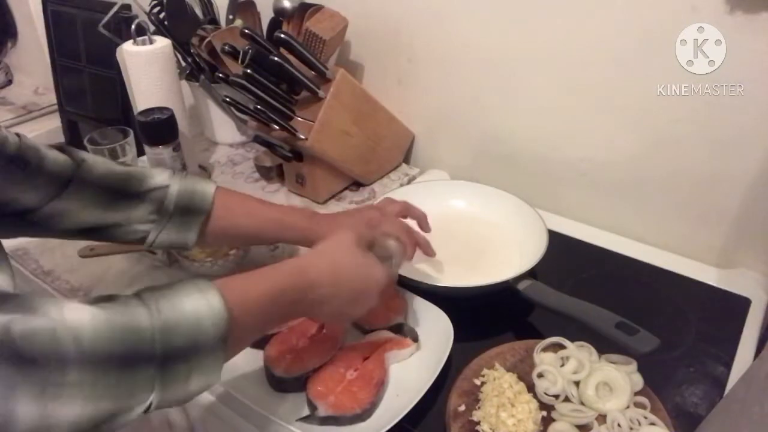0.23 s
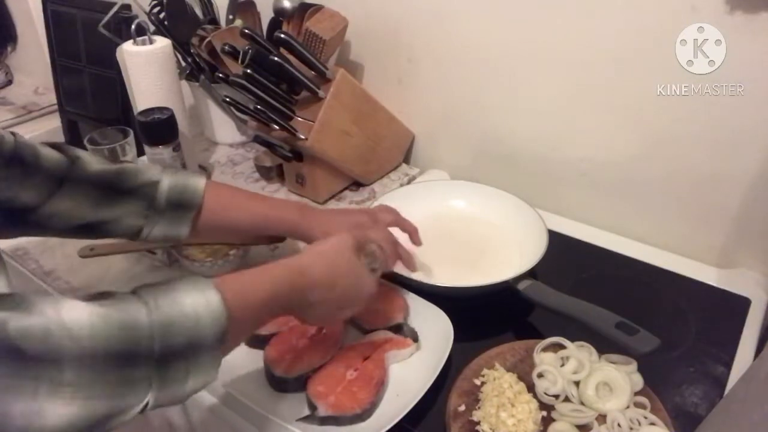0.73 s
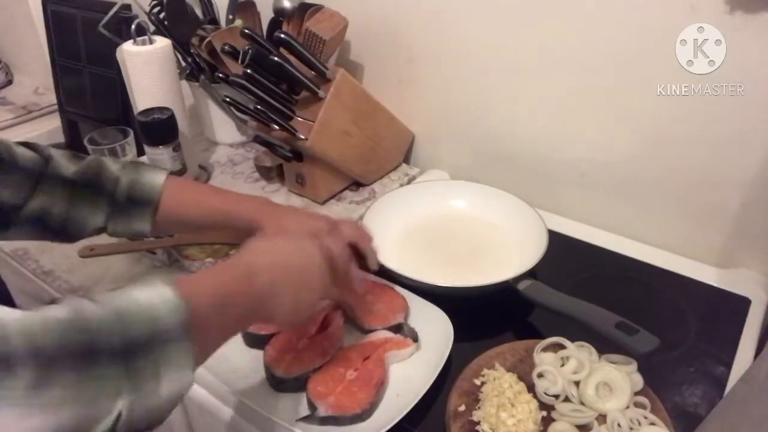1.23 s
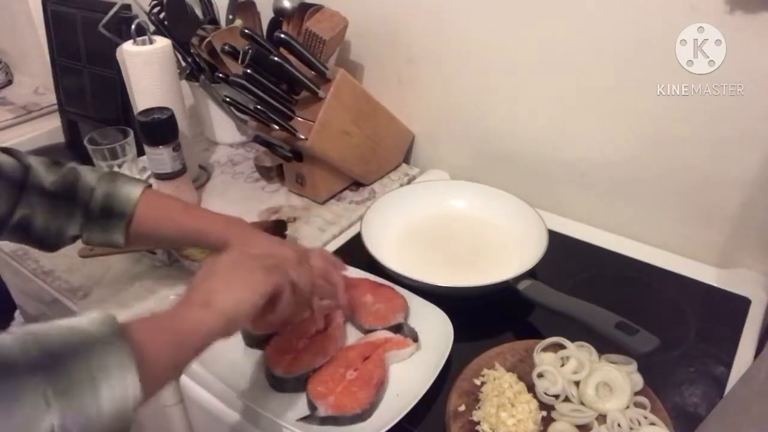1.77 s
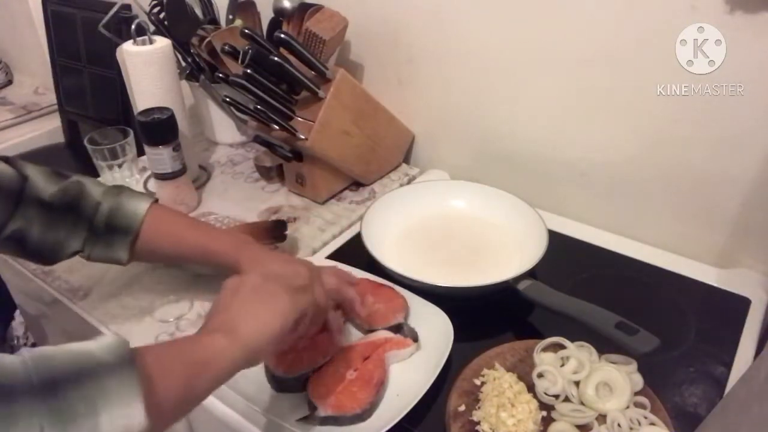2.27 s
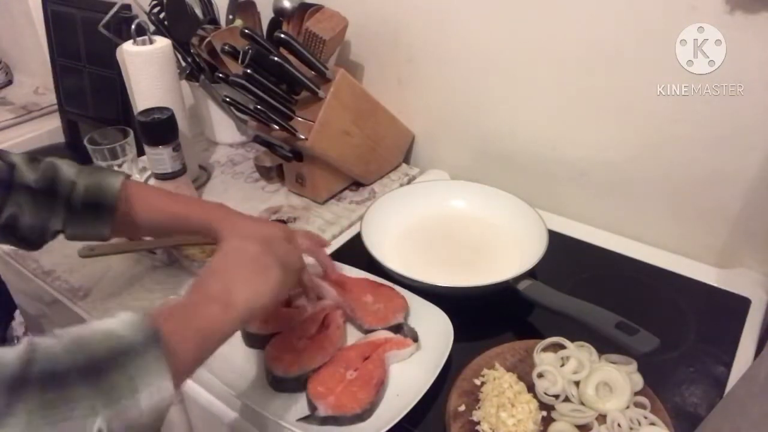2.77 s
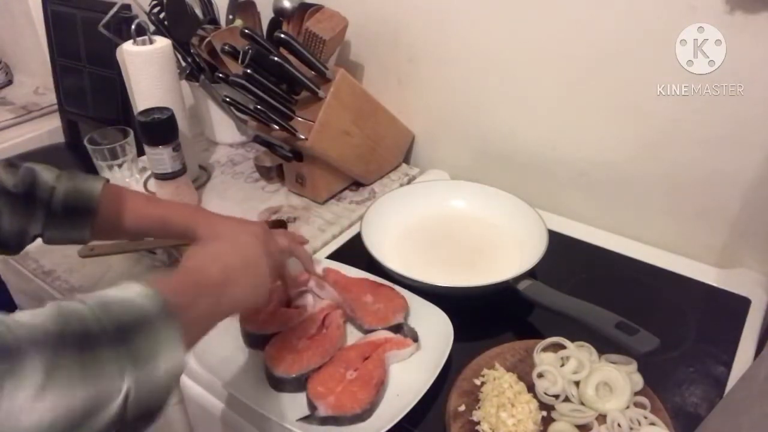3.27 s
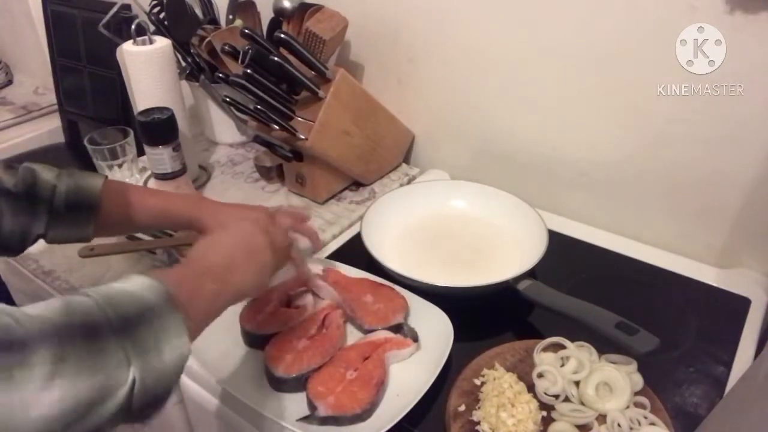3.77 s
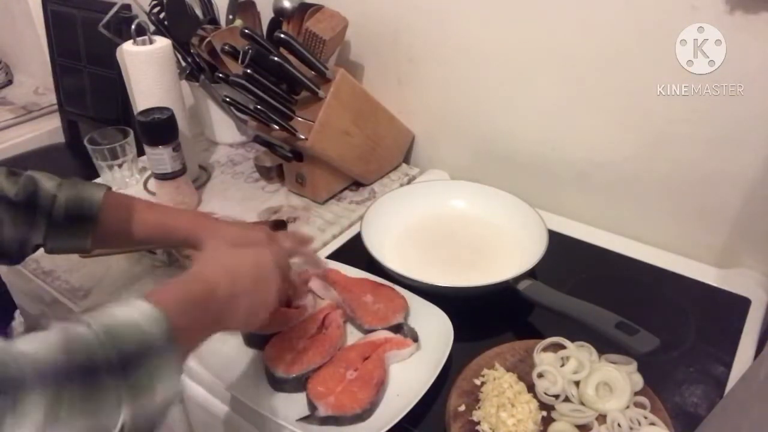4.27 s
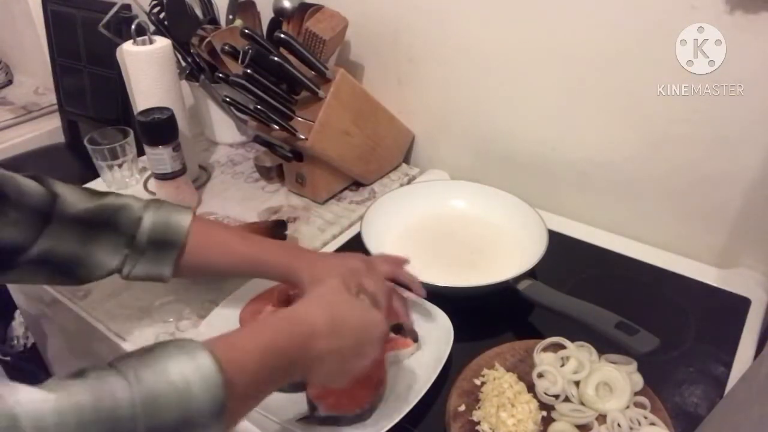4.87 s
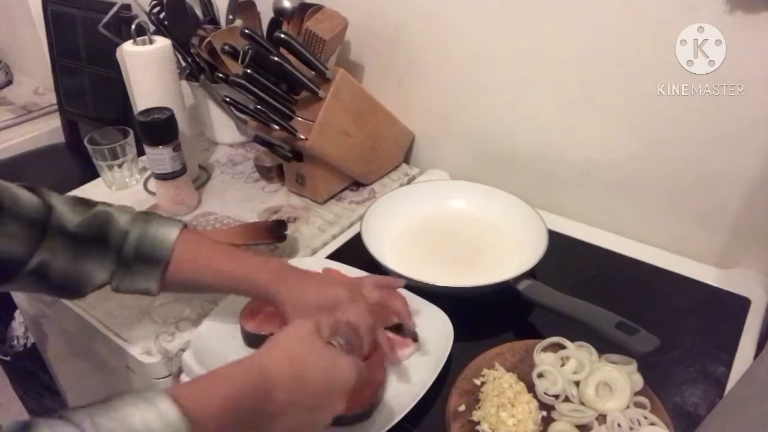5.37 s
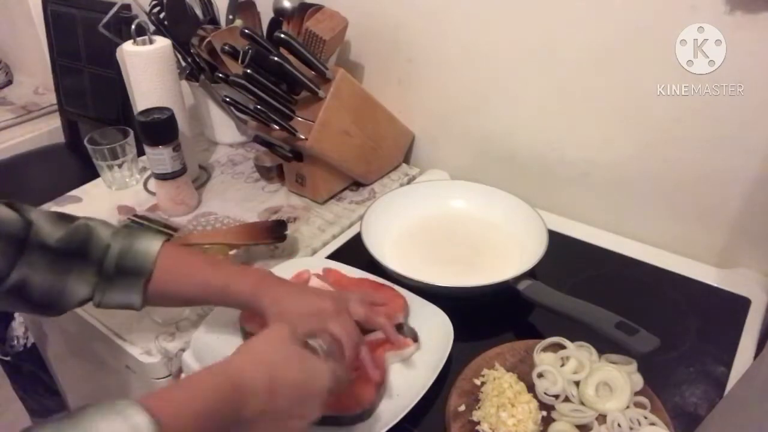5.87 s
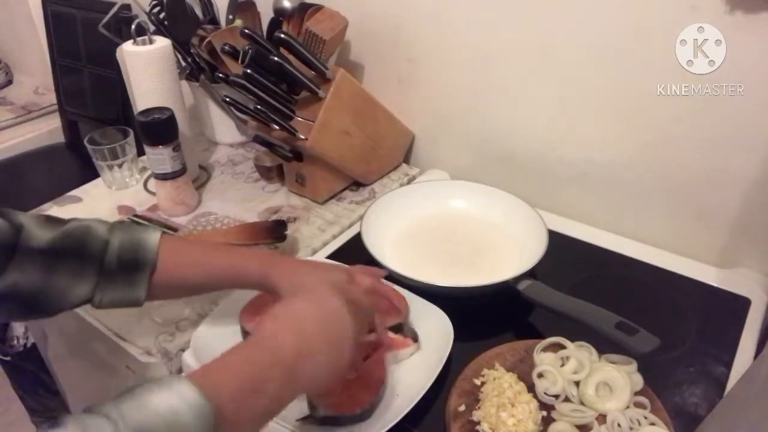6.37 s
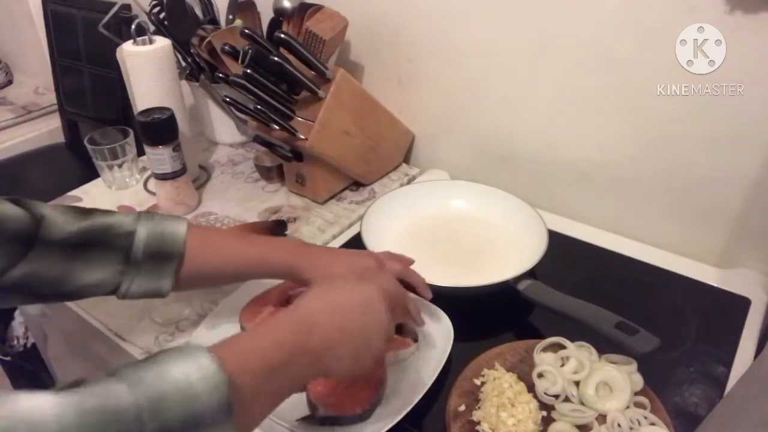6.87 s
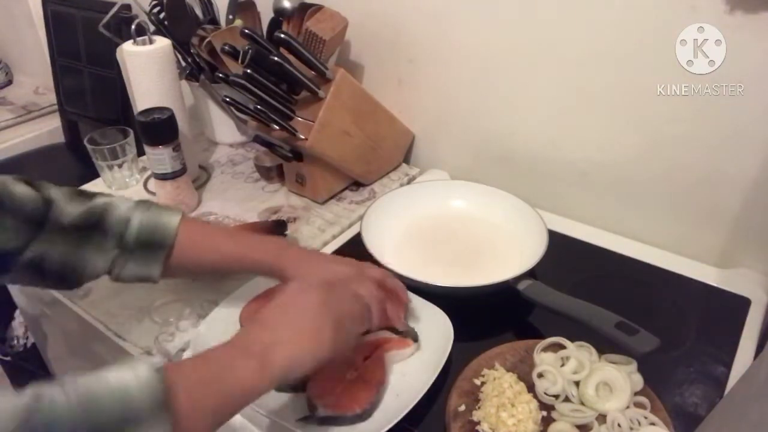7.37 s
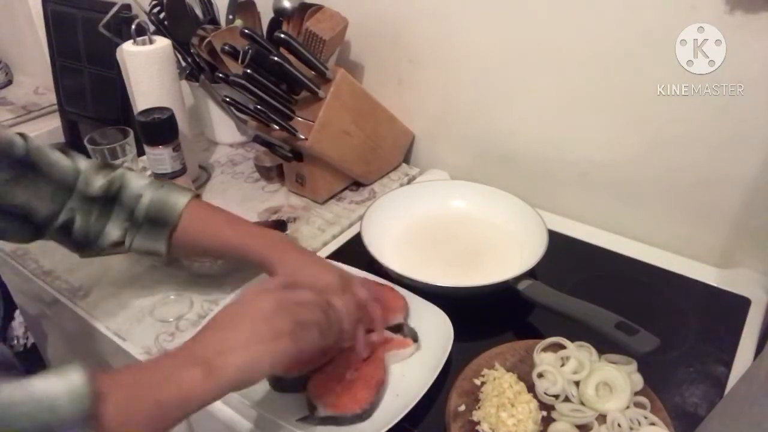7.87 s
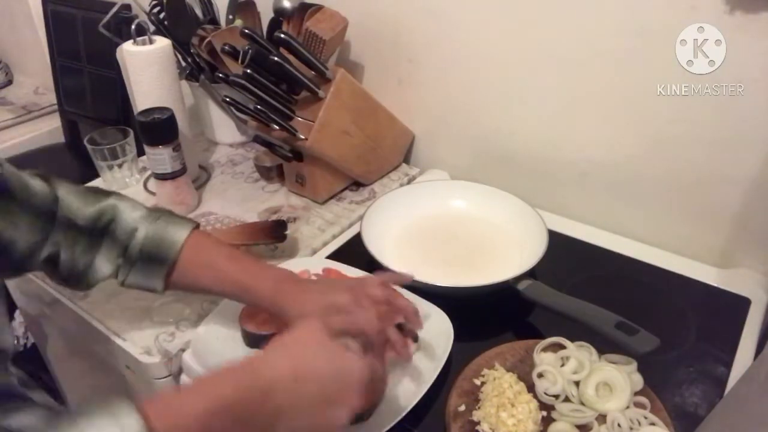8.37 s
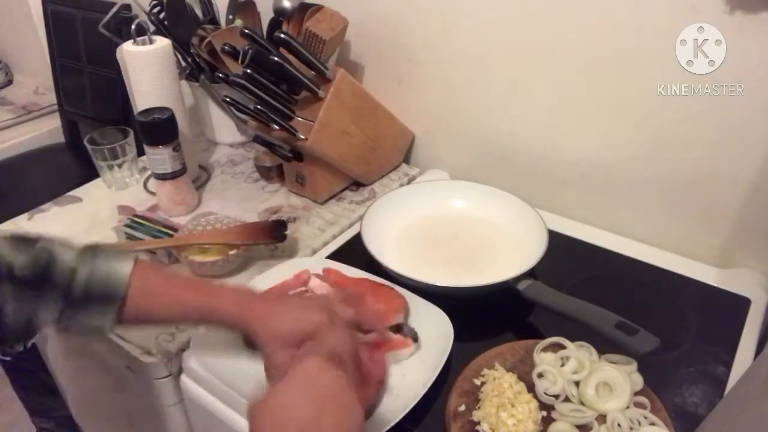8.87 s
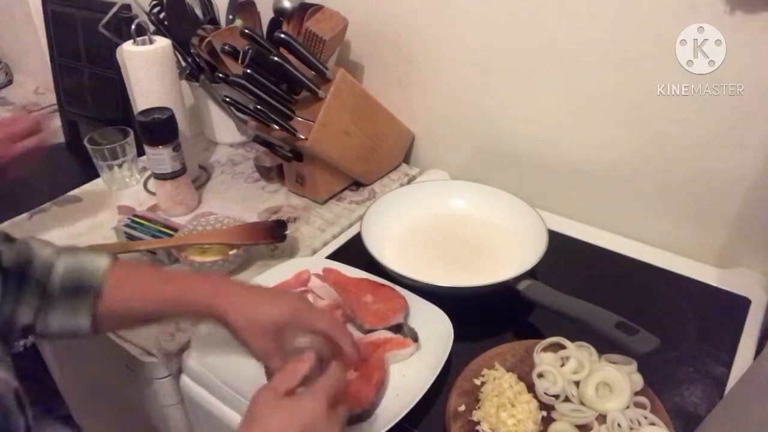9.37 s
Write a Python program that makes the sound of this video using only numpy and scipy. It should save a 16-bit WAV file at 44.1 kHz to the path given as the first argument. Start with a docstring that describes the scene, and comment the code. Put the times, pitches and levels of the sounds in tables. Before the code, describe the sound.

A hand pepper mill is ground close to the microphone in a small, hard-walled kitchen with a short echo. From 0 s, twists come roughly every half second, each a dry crunch lasting about 0.2 s: sharp corn cracks, fine grit, bright shell fizz and a hollow ringing body. Between them, lighter scrapes and stray clicks mark the hand changing grip. A loose part chatters briefly at 0.8 s. At 2.6 s a dull woody knock lands with quick weaker bounces. Grinding continues steadily, varying in force, with strong cracks near 5.2 and 6.5 s. Soft low bumps and a faint tap fall around 7.1 to 7.4 s. From 7.8 s a bright rustling hiss mixes in, strongest near 8.8 s, as the last twist ends. By 9.1 s only faint rustles remain, then two thin high metal pings at 9.45 s. Quiet hum, room tone and slow air rumble lie underneath.

```python
"""Pepper mill in a tiled kitchen

A hand pepper mill is twisted in quick turns: corns crack with a sharp click and a split in noise over a crunch
of fine grit; they drive the shells' fizz, a narrow burr tone, the dull body and its ringing modes.
A loose part rattles, something knocks and bumps, a hiss rustles late on and thin metal pings end it.
Scattered taps make the kitchen's echo; mains hum, room tone and slow air rumble lie beneath."""
import sys
import numpy as np
from scipy import signal
from scipy.io import wavfile
from scipy.ndimage import uniform_filter1d

SR = 44100
rng = np.random.default_rng(int(sys.argv[2]) if len(sys.argv) > 2 else 0)


def put_to_file(sound):
    """Save the sound as 16-bit audio at rate SR, in the file named by the first command-line argument."""
    columns = np.atleast_2d(sound).T  # one column per channel
    safe = np.clip(columns, -1, 1)
    whole_steps = np.round(safe * 32767)
    wavfile.write(sys.argv[1], SR, whole_steps.astype(np.int16))


N = 423801  # length in samples
CONTROL_STEP = 32  # samples between points of a stroke's level


def gain_of(db):
    """Amplitude ratio of a level in dB."""
    return 10 ** (np.asarray(db) / 20)


def evened(x):
    """The same sound at rms 1."""
    return x / np.sqrt(np.mean(x ** 2) + 1e-20)


def read(points, hz):
    """Value of a curve at each frequency, joined along log frequency."""
    f, value = np.transpose(points)
    return np.interp(np.log(hz + 1), np.log(f + 1), value)


def add(mix, s, sound):
    """Lay a sound into the mix at s seconds, cut at the end."""
    part = mix[round(s * SR):][:len(sound)]
    part += sound[:len(part)]


def coloured(x, spectrum, size=4096):
    """Causal filter of unit energy: the phase follows from the log gain."""
    hz = abs(np.fft.fftfreq(size, 1 / SR))
    log_gain = np.log(gain_of(np.maximum(read(spectrum, hz), -100)))
    taps = np.fft.ifft(np.exp(np.conj(signal.hilbert(log_gain)))).real[:size // 2]
    return signal.oaconvolve(x, taps / np.linalg.norm(taps))[:len(x)]


def wander(hz, kind="lowpass"):
    """Slow random drift of rms 1."""
    noise = rng.standard_normal(N + 2 * SR)
    sos = signal.butter(2, hz, kind, fs=SR, output="sos")
    return evened(signal.sosfiltfilt(sos, noise)[SR:-SR])


def burst(t, rise_s, fall_s):
    """Quick swell and exponential decay, top 1."""
    shape = (1 - np.exp(-t / rise_s)) ** 2 * np.exp(-t / fall_s)
    return shape / shape.max()


def ring(x, hz, t60):
    """A damped mode whose answer to one click has about unit energy; it passes no steady push."""
    r = gain_of(-60 / (t60 * SR))  # decay per sample
    poles = [1, -2 * r * np.cos(2 * np.pi * hz / SR), r ** 2]
    return np.sqrt(1 - r ** 2) * signal.lfilter([1, 0, -1], poles, x) / np.sqrt(2)


def mottled(x, depth_db):
    """Random patches of louder and softer colour, about 1 kHz wide and 12 ms long."""
    z = signal.stft(x, nperseg=128)[2]
    patches = uniform_filter1d(rng.standard_normal(z.shape), size=3, axis=0)
    patches = evened(uniform_filter1d(patches, size=8, axis=1))
    return signal.istft(z * gain_of(depth_db * patches), nperseg=128)[1][:N]


def stroke(start, rise_s, hold_s, db, fall):
    """Power of one movement, and time since its start: a quick climb, a hold, a steady fall in dB."""
    t = np.arange(N // CONTROL_STEP + 2) * CONTROL_STEP / SR - start
    climb_db = 30 * np.clip(1 - t / max(rise_s, .001), 0, 1)
    fall_db = fall * np.maximum(t - rise_s - hold_s, 0)
    return (t > 0) * gain_of(2 * (db - climb_db - fall_db)), np.maximum(t, 0)


def smooth(power):
    """Amplitude at every sample, drawn between the control steps."""
    return np.interp(np.arange(N) / CONTROL_STEP, np.arange(len(power)), np.sqrt(power))


# Spectrum of the room tone. Each row: frequency in Hz, relative density in dB per Hz.
ROOM_TONE = [(35, -60), (60, -13), (103, -16.5), (346, -16.5), (903, -18.5), (991, -18.5), (1110, -24.5),
             (4640, -26), (6430, -24.5), (16000, -47)]
ROOM_TONE_DB = -60.5


def room_tone():
    """Steady noise coloured as the air of the room."""
    return gain_of(ROOM_TONE_DB) * coloured(rng.standard_normal(N), ROOM_TONE)


# Hums of mains and motors. Each row: frequency in Hz, rms level in dB.
HUMS = [(42.4, -71), (49.285, -59), (50.013, -64), (100, -79)]
HUM_DIP_S = .47  # the two close hums oppose each other here, and once every beat


def hum():
    """Sines in alternating sign; the two closest in pitch beat slowly."""
    t = np.arange(N) / SR - HUM_DIP_S
    out = np.zeros(N)
    for k, (hz, db) in enumerate(HUMS):
        out += (-1) ** k * gain_of(db) * np.sqrt(2) * np.sin(2 * np.pi * hz * t)
    return out


# Slow air pressure on the microphone. Each row: time in seconds, rms level in dB.
AIR_RUMBLE = [(0, -53), (9.61, -46.5)]


def air_rumble():
    """Noise between 4 and 22 Hz whose level follows the table."""
    level_db = np.interp(np.arange(N) / SR, *np.transpose(AIR_RUMBLE))
    return gain_of(level_db) * wander([4, 22], "bandpass")


def background():
    """Room tone, beating hums and very low air rumble together."""
    return room_tone() + hum() + air_rumble()


# How long the tiled kitchen rings. Each row: frequency in Hz, time to fall 60 dB in seconds.
KITCHEN_DECAY = [(300, 0.19), (800, 0.28), (2100, 0.24), (5500, 0.25), (12000, 0.13)]
KITCHEN_DB = -8  # echo against the near sound


def kitchen(x):
    """Sparse taps of random sign, each band dying at its own speed; three tails take turns."""
    turn = np.arange(N) / SR * 2 * np.pi * 3  # 3 Hz
    out = np.zeros(N)
    for k in range(3):
        taps = np.zeros(SR // 2 + 200)
        at = np.arange(150, SR // 2, 20)
        taps[at + rng.integers(0, 20, len(at))] = rng.choice([-1., 1.], len(at))
        hz, t, z = signal.stft(taps, SR, nperseg=256)
        decay = gain_of(-60 * t / read(KITCHEN_DECAY, hz)[:, None])
        tail = signal.istft(z * decay, SR, nperseg=256)[1]
        tail *= np.minimum(np.arange(len(tail)) / (0.014 * SR), 1)  # the walls answer late
        share = np.sqrt(2 / 3) * np.cos(turn + k * 2 * np.pi / 3)
        out += signal.oaconvolve(x * share, tail / np.linalg.norm(tail))[:N]
    return gain_of(KITCHEN_DB) * out


# Soft low bumps. Each row: start in seconds, level at the top in dB.
BUMPS = [(7.148, -49), (7.292, -56), (7.37, -54)]


def bumps():
    """Noise between 70 and 420 Hz that swells at once and dies softly."""
    out, t = np.zeros(N), np.arange(SR // 3) / SR
    low = signal.butter(2, [70, 420], "bandpass", fs=SR, output="sos")
    for s, db in BUMPS:
        noise = evened(signal.sosfilt(low, rng.standard_normal(len(t))))
        add(out, s, gain_of(db) * noise * burst(t, 0.0017, 0.084))
    return out


# A blow, two weaker bounces and a faint later tap.
# Each row: start in seconds, relative level in dB, pitch as a ratio.
KNOCK_HITS = [(2.627, -32.5, 0.98), (2.64, -35, 1.02), (2.68, -40, .9), (7.378, -52, 1.06)]
# Spectrum of the knocked wood. Each row: frequency in Hz at pitch ratio 1, relative density in dB per Hz.
KNOCKED_WOOD = [(120, -22), (220, -12), (650, -9), (1000, 3), (1400, -9.5), (2000, -22), (3100, -13),
                (5000, -24), (9000, -50)]


def knocks():
    """A short burst of noise through the dull colour of wood, shifted in pitch for each hit."""
    out, t = np.zeros(N), np.arange(SR // 3) / SR
    for s, db, pitch in KNOCK_HITS:
        wood = [(hz * pitch, v) for hz, v in KNOCKED_WOOD]
        blow = rng.standard_normal(len(t)) * burst(t, 0.00027, 0.021)
        add(out, s, gain_of(db) * coloured(blow, wood))
    return out


# Thin metal pings. Each row: start in seconds, level in dB before the soft onset trims it.
METAL_PINGS = [(9.45, -61), (9.472, -55)]
PING_HZ, PING_T60 = 13700, 0.2  # Hz, s to fall 60 dB


def pings():
    """One high sine with a soft onset and an even fall in dB."""
    out, t = np.zeros(N), np.arange(SR // 3) / SR
    metal = gain_of(-60 * t / PING_T60) * np.sin(2 * np.pi * PING_HZ * t) * (1 - np.exp(-t / 0.0024))
    for s, db in METAL_PINGS:
        add(out, s, gain_of(db) * metal)
    return out


# A rustling hiss that sets in suddenly. Each row: start in seconds, rise in seconds, hold in seconds,
# level in dB, fall in dB per second, brightness in dB (lifts the treble half, lowers the dull half).
RUSTLE_STROKES = [(7.765, 0.0034, 0.33, -37.5, 115, -0.5), (8.203, .01, .01, -41.5, 148, -2),
                  (8.668, 0.002, 0.023, -34.5, 200, -0.5), (8.772, 0.047, 0.006, -29.5, 137, -1.7),
                  (8.946, 0.0039, .005, -36.5, 215, 0), (9.127, .012, 0.013, -52, 106, -4),
                  (9.2, 0.035, 0.018, -52.5, 300, -8), (9.442, 0.026, 0.0091, -57, 148, 1)]
# Spectrum of the rustle. Each row: frequency in Hz, relative density in dB per Hz.
RUSTLE_COLOUR = [(180, -44), (300, -9), (656, -10.5), (900, -10.5), (2070, -6), (4440, -8.5), (7690, -1),
                 (12500, -18.5), (16000, -21)]
TICKS_PER_S, TICKS_DB = 150, -14  # crackle, level against the hiss
TICK_SPREAD_DB = 4.5  # scale of the random tick sizes
TILT_HZ = 4000  # parts the dull and bright halves


def rustle():
    """Fine dense hiss with a light flutter and scattered crackle; each rustle is duller or brighter."""
    t = np.arange(200) / SR
    size = gain_of(TICK_SPREAD_DB * np.minimum(rng.exponential(1, N), 4))
    ticks = size * (rng.random(N) < TICKS_PER_S / SR)
    crackle = gain_of(TICKS_DB) * signal.oaconvolve(ticks, burst(t, .0001, 0.00077))[:N]
    drive = (1 + crackle) * gain_of(2.0 * wander(83)) * rng.standard_normal(N)
    out = np.zeros(N)
    for kind, sign in (("lowpass", -1), ("highpass", 1)):
        power = sum(stroke(*row[:-1])[0] * gain_of(2 * sign * row[-1]) for row in RUSTLE_STROKES)
        b, a = signal.butter(2, TILT_HZ, kind, fs=SR)
        out += sign * signal.lfilter(b, a, smooth(power) * drive)  # opposite signs join without a hollow
    return mottled(coloured(out, RUSTLE_COLOUR), 0.64)


# A loose part of the mill chatters. Each row: start in seconds, relative level in dB.
RATTLE_HITS = [(0.8233, -23), (0.83, -27), (0.8351, -22), (0.855, -25.5)]
# Modes of the loose part. Each row: frequency in Hz, relative level in dB, time to fall 60 dB in seconds.
LOOSE_PART = [(2490, -1, 0.017), (6330, -0.5, 0.0064), (11240, -17, .012)]


def rattle():
    """Short knocks of noise ring three modes of the loose part."""
    taps, t = np.zeros(N), np.arange(300) / SR
    for s, db in RATTLE_HITS:
        knock = evened(burst(t, 0.0002, 0.0015) * rng.standard_normal(len(t)))
        add(taps, s, gain_of(db) * knock * .35)
    return sum(gain_of(db) * ring(taps, hz, t60) for hz, db, t60 in LOOSE_PART)


# Turns of the wrist. Each row: start in seconds, rise in seconds, hold in seconds, crunch in dB,
# weight in dB (how much more the body sounds at the start), grit that keeps trickling in dB,
# low thrum in dB (the gain of the body's lows).
WRIST_TURNS = [(0.036, 0.039, 0.056, -40, 6.5, -42.5, -0.5), (0.488, 0.059, 0.033, -34.5, 7, -43.5, -1),
               (0.918, 0.048, 0.056, -37, 7.5, -44, -2), (1.362, 0.034, 0.031, -33, 4.5, -43.5, -2),
               (1.78, 0.06, 0.078, -34, 3.5, -53.5, -5.5), (2.246, 0.054, 0.019, -32.5, 6, -47, -4),
               (2.714, 0.038, 0.053, -37.5, 5, -47, 0.5), (3.16, 0.058, 0.051, -34.5, 0.5, -52.5, 1.5),
               (3.633, 0.053, 0.042, -38, 1, -50, 1), (4.11, 0.031, 0.034, -33, 2, -56, 4.5),
               (4.607, 0.021, 0.065, -39.5, 0.5, -52.5, 6.5), (5.049, 0.052, 0.026, -35.5, 3.5, -48.5, 0.5),
               (5.543, 0.046, 0.062, -35.5, 4.5, -55, 3.5), (6.013, 0.052, 0.042, -34, 4, -63, 0.5),
               (6.47, 0.041, 0.093, -40, 8, -52.5, -3), (6.973, 0.046, 0.022, -33, 3.5, -51.5, 2.5),
               (7.432, 0.025, 0.063, -34.5, 3.5, -52, -2), (7.92, 0.027, 0.013, -29, 1.5, -65, -4.5),
               (8.244, 0.016, 0.01, -38, 2.5, -51.5, -9), (8.757, 0.04, 0.026, -32.5, 6, -54, -0.5)]
# The hand slides back for a new grip and scrapes the burrs.
# Each row: start in seconds, hold in seconds, crunch in dB, weight in dB.
GRIP_CHANGES = [(0, 0.01, -46, -4), (0.343, 0.055, -48.5, -3), (0.796, 0.032, -45.5, 1.5),
                (1.185, 0.017, -56, 8.5), (1.686, 0.073, -52, -10), (2.049, 0.25, -47, -1),
                (2.59, 0.12, -55.5, 2), (3.457, 0.2, -54, -1), (3.92, 0.025, -50.5, 7),
                (4.371, .04, -56, -2.5), (4.893, 0.019, -48.5, -2), (5.305, 0.11, -57.5, 12.5),
                (5.895, 0.018, -53.5, -16), (6.23, 0.082, -52, -1), (7.678, 0.026, -44.5, -8),
                (8.495, 0.02, -44, -1)]
# dB a second: the crunch dies, the body falls quiet first, the trickle thins
TURN_FALL, LIGHTEN, TRICKLE_FALL = 177, 32, 32
REGRIP_RISE_S, REGRIP_FALL = 0.0023, 140  # s, dB a second


def effort():
    """How hard the burrs crunch and how hard they shake the body, summed as power."""
    crunch = shake = 0
    for s, rise_s, hold_s, db, weight_db, trickle_db, _ in WRIST_TURNS:
        turn, t = stroke(s, rise_s, hold_s, db, TURN_FALL)
        trickle, _ = stroke(s, rise_s, hold_s, trickle_db, TRICKLE_FALL)
        crunch = crunch + turn + trickle
        shake = shake + turn * gain_of(2 * (weight_db - LIGHTEN * t)) + trickle
    for s, hold_s, db, weight_db in GRIP_CHANGES:
        scrape, _ = stroke(s, REGRIP_RISE_S, hold_s, db, REGRIP_FALL)
        crunch = crunch + scrape
        shake = shake + scrape * gain_of(2 * weight_db)
    return smooth(crunch), smooth(shake)


THRUM_HZ, LOOSE_THRUM_DB = 604, -4.5  # the thrum lies below this pitch; its gain while the grip is loose


def gripped(body):
    """Each grip of the hand lets more or less of the body's low thrum through."""
    firm = [(row[0], row[-1]) for row in WRIST_TURNS]
    loose = [(row[0], LOOSE_THRUM_DB) for row in GRIP_CHANGES]
    s, db = np.transpose(sorted(firm + loose))
    latest = np.clip(np.searchsorted(s, np.arange(N) / SR) - 1, 0, None)
    thrum = uniform_filter1d(gain_of(db)[latest], size=400)
    low = signal.sosfiltfilt(signal.butter(2, THRUM_HZ, fs=SR, output="sos"), body)
    return body - low + thrum * low


GRIT_PER_S, GRIT_SPREAD_DB = 420, 4.5  # fractures, scale of their random sizes
RASP_DB = -2  # against the grains


def grit():
    """Tiny fractures over a rasp, clumped as the burrs stick and slip; gives bright and heavy drive."""
    crunch, shake = effort()
    t = np.arange(400) / SR
    size = gain_of(GRIT_SPREAD_DB * np.minimum(rng.exponential(1, (2, N)), 3.3))
    shared, own = rng.random(N), rng.random((2, N))
    chance = .5 * GRIT_PER_S / SR  # half the fractures strike both drives at once
    hit = size * ((shared < chance) | (own < chance))
    grains = signal.oaconvolve(hit, burst(t, 0.0002, 0.002)[None], axes=1)[:, :N]
    clumps = gain_of(1.08 * wander(36))
    drive = (evened(grains) + gain_of(RASP_DB)) * rng.standard_normal((2, N)) * clumps
    return evened(drive[0]) * crunch, evened(drive[1]) * shake


# Corns that crack. Each row: time of the snap in seconds, relative level in dB,
# weight in dB (half is added to the body's push, half taken off the shell),
# tone in Hz (the part of the mill that takes the blow).
CORN_CRACKS = [(0.0754, -9.5, -4.5, 2330), (0.1033, -17.5, -3, 1830), (0.1393, -12.5, -5, 1570),
               (0.159, -13.5, -8, 1830), (0.1731, -15.5, -8, 1770), (0.295, -31.5, -8, 1900),
               (0.322, -32, -16, 1200), (0.352, -16, 5.5, 2060), (0.3595, -14, -1, 2040),
               (0.548, -26, 6, 1700), (0.5606, -20, 6, 1610), (0.581, -15, 2, 2190),
               (0.627, -26, 17.5, 1730), (0.6315, -22.5, -19.5, 2300), (0.8022, -20, 2, 2200),
               (0.963, -21, 10, 2300), (0.9876, -9.5, -6.5, 2400), (0.9979, -10.5, 6.5, 1870),
               (1.0451, -18, 3, 1930), (1.117, -28, 14, 2320), (1.2012, -22.5, 10, 2440),
               (1.223, -29, 6, 2410), (1.3951, -21.5, 3, 1850), (1.4192, -22, 2, 1460),
               (1.432, -12.5, -6, 1290), (1.4516, -16, -7, 2300), (1.699, -21.5, -3.5, 2300),
               (1.8567, -12, 10, 1980), (1.8643, -16, -9, 1940), (2.0476, -27, -2, 2140),
               (2.0655, -24, -3, 1940), (2.2777, -21, -4, 1300), (2.3004, -17.5, -10, 1900),
               (2.3358, -12, -0.5, 1900), (2.4957, -26.5, 9, 2240), (2.5728, -22.5, 1, 1900),
               (2.731, -31, -5, 1330), (2.7623, -19.5, 3, 1430), (2.7778, -22.5, 16.5, 1440),
               (2.803, -18.5, 0, 2130), (2.815, -17, -8, 2100), (2.872, -24.5, 3, 1870),
               (2.951, -39, -1, 1860), (2.9822, -31, -15, 1880), (3.174, -29, -5, 1330),
               (3.224, -20, 1, 1460), (3.2537, -18, 11, 1440), (3.2941, -22.5, -5, 1440),
               (3.4553, -30, -3, 2100), (3.518, -26.5, -4, 2060), (3.6715, -21.5, -3, 2320),
               (3.6887, -24, 7, 1480), (3.7105, -14.5, 2.5, 1440), (3.724, -23.5, 13, 1460),
               (3.763, -16, 1, 2120), (3.777, -17.5, 9.5, 1690), (3.915, -31, 5, 1740),
               (3.9331, -16.5, -0.5, 1740), (3.962, -27, 4, 2260), (4.14, -18, 3, 2000),
               (4.158, -19.5, 7.5, 1400), (4.1688, -26, -2, 1440), (4.224, -19, 0.5, 1830),
               (4.3604, -31, 4, 1760), (4.6071, -37, 2, 1070), (4.6548, -19, 0, 1104),
               (4.667, -23, 7, 1570), (4.701, -26, 10, 1600), (4.729, -23, -7, 2220),
               (4.742, -22.5, 0, 1220), (4.7658, -29.5, -8, 1900), (4.9025, -16.5, 2.5, 2100),
               (5.0644, -33.5, 5, 2230), (5.095, -17, 11, 2230), (5.13, -18.5, -10, 1690),
               (5.1899, -12, 1.5, 2100), (5.3416, -23.5, -8, 1640), (5.4166, -35, 20, 1960),
               (5.564, -33, 7, 1470), (5.589, -16.5, -2, 1850), (5.6083, -19.5, 4, 2030),
               (5.701, -22, 7.5, 1640), (5.8082, -42, 8, 1470), (5.9314, -29, 3, 1770),
               (6.0154, -36, -2, 960), (6.0375, -27, 20, 1530), (6.0503, -24.5, 28.5, 2020),
               (6.0951, -21, -8, 1900), (6.103, -12, -7.5, 1870), (6.2468, -29.5, 6, 1980),
               (6.2964, -28.5, 5, 2160), (6.3643, -33, 8, 2160), (6.492, -29.5, 4, 1050),
               (6.5121, -13.5, 5, 2220), (6.5502, -5, 8, 2270), (6.5741, -24.5, -12, 2080),
               (6.6196, -17.5, -3, 2020), (6.961, -32, 3, 3270), (6.995, -19.5, 7.5, 1540),
               (7.015, -11.5, 0, 1960), (7.027, -17, 1, 2040), (7.078, -17.5, -4, 1970),
               (7.0927, -23, -16, 1410), (7.111, -21.5, 5, 2000), (7.2976, -29, 7, 2320),
               (7.433, -32, 3, 1030), (7.461, -20.5, -9, 1540), (7.472, -14, 1, 1540),
               (7.4994, -18.5, 4, 1540), (7.5124, -9.5, -1, 2170), (7.674, -33, 4, 2060),
               (7.711, -28.5, 6, 2100), (7.95, -17, 15, 2140), (7.97, -13, 6, 2360), (7.986, -15, 0, 1980),
               (8.21, -27.5, -1, 2180), (8.263, -17.5, 6, 2520), (8.2689, -12.5, -1.5, 1860),
               (8.5031, -27.5, -9, 1970), (8.775, -28, 8, 1390), (8.799, -20.5, 24, 2160),
               (8.8434, -15.5, -8, 1310), (8.9513, -28, -10, 2020)]
SNAP_DB = 8  # the click that opens each crack, against its split


def cracks():
    """Each crack has a very faint noise swell, then a sharp click and a split in noise.

    The body's push rises more slowly than the shell's split and dies a little sooner."""
    bright, heavy, t = np.zeros(N), np.zeros(N), np.arange(800) / SR
    swell = gain_of(-17) * np.exp((t - t[-1]) / .004)
    click = gain_of(SNAP_DB) * (t == 0)
    shell, push = burst(t, .0001, 0.0025), burst(t, 0.00059, .002)

    def crack(mix, s, db, shape, swell_noise):
        split = shape * rng.standard_normal(len(t))
        split *= np.linalg.norm(shape) / np.linalg.norm(split)
        add(mix, s - t[-1], gain_of(db) * np.concatenate([swell * swell_noise, split + click]))

    for s, db, weight_db, _ in CORN_CRACKS:
        crack(bright, s, db - weight_db / 2 - 8, shell, .5 * rng.standard_normal(len(t)))
        crack(heavy, s, db + weight_db / 2 - 10, push, rng.standard_normal(len(t)))
    # too brief to stir the low thrum
    return bright, signal.lfilter(*signal.butter(1, 600, "highpass", fs=SR), heavy)


# Spectrum of mill and counter. Each row: frequency in Hz, relative density in dB per Hz.
MILL_BODY = [(88, -65.5), (150, -31), (273, -15), (337, -1.5), (533, -6.5), (695, -14), (1030, -6),
             (1720, -2), (1980, -2.5), (2210, -1.5), (2540, -9), (3600, -13.5), (4200, -14), (5460, -31),
             (9240, -120)]
# Spectrum of breaking shells. Each row: frequency in Hz, relative density in dB per Hz.
SHELL_FIZZ = [(1470, -64.5), (2500, -7.5), (3920, -13), (4520, -12.5), (5510, -11), (6400, 1), (7090, -7.5),
              (7920, -5), (9490, -16.5), (12000, -20.5), (16500, -33.5)]
# Ringing modes of the mill. Each row: frequency in Hz, relative level in dB when the blow's tone
# matches it, time to fall 60 dB in seconds.
MILL_MODES = [(975, 13.5, 0.012), (1433, 3, 0.028), (1553, -6, 0.086), (1722, 1, 0.015),
              (1970, -0.5, 0.023), (2123, 0.5, 0.04), (2473, -0.5, 0.038)]
BURR_HZ, BURR_T60, BURR_DB = 6255, 0.034, -12.5  # the grinding burr rings in a narrow treble band


def mill():
    """Grit and cracks sound through the shells' fizz, the broad body and the modes nearest the last blow."""
    (fine, rub), (snap, push) = grit(), cracks()
    bright, heavy = fine + snap, rub + push
    s, tone = np.array(CORN_CRACKS)[:, [0, 3]].T
    latest = np.searchsorted(s, np.arange(N) / SR + .003) - 1  # the tone moves 3 ms ahead of the snap
    tone = tone[np.clip(latest, 0, None)]
    mode_drive = gain_of(-12 + 7.7 * wander(34)) * rub + push  # the rub drives the modes unevenly
    modes = np.zeros(N)
    for hz, db, t60 in MILL_MODES:
        nearness = gain_of(db - 64.0 * abs(np.log2(tone / hz)))  # 64 dB an octave
        modes += ring(mode_drive * nearness, hz, t60)
    burr = gain_of(BURR_DB) * ring(bright, BURR_HZ, BURR_T60)
    broad = coloured(bright, SHELL_FIZZ) + burr + gripped(coloured(heavy, MILL_BODY))
    return mottled(broad, 2.6) + gain_of(-1.5) * modes


def scene():
    """The mill and the small sounds, their echo in the kitchen, and the background."""
    near = mill() + rattle() + rustle() + knocks() + pings() + bumps()
    return (near + kitchen(near) + background())[None]


EDGE_HZ = 15800  # top of the recorder's band


def record(dry):
    """The band limit of the recorder: a steep lowpass."""
    lowpass = signal.firwin(511, EDGE_HZ, window=("kaiser", 9), fs=SR)
    return signal.oaconvolve(dry, lowpass[None], "same")


dry = scene()
out = record(dry)
put_to_file(out)
```